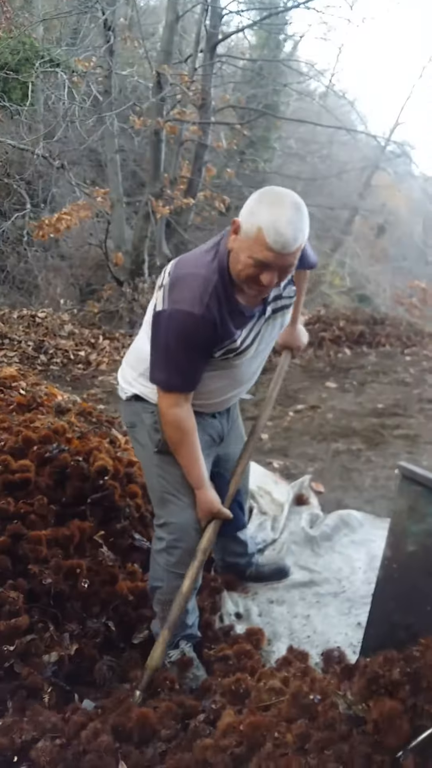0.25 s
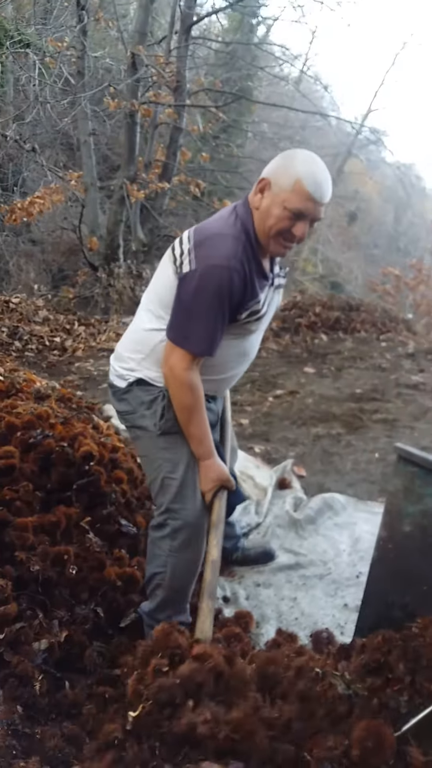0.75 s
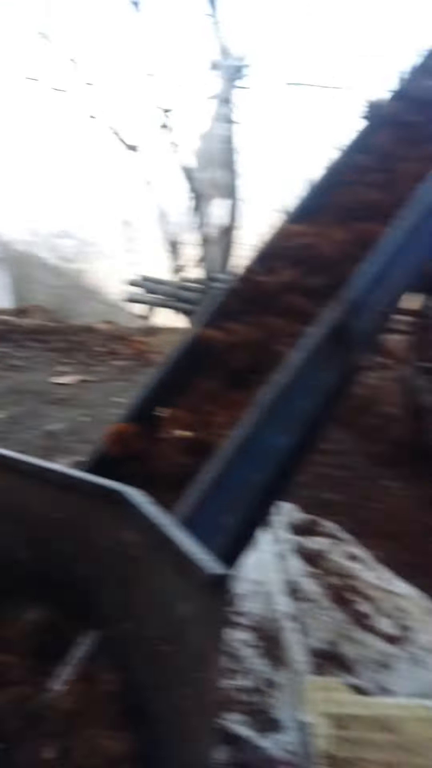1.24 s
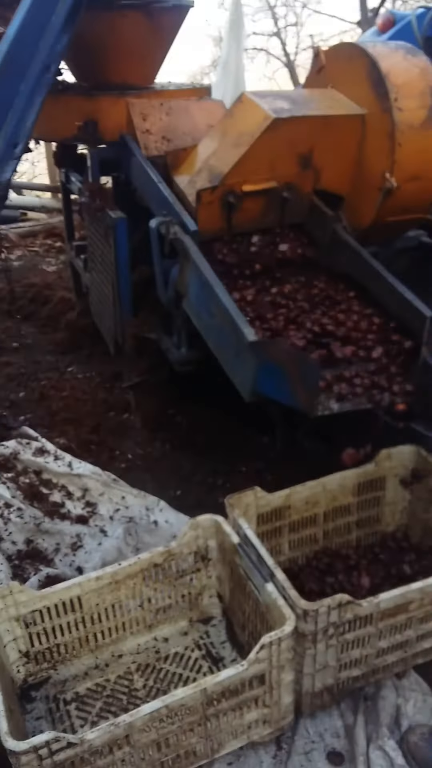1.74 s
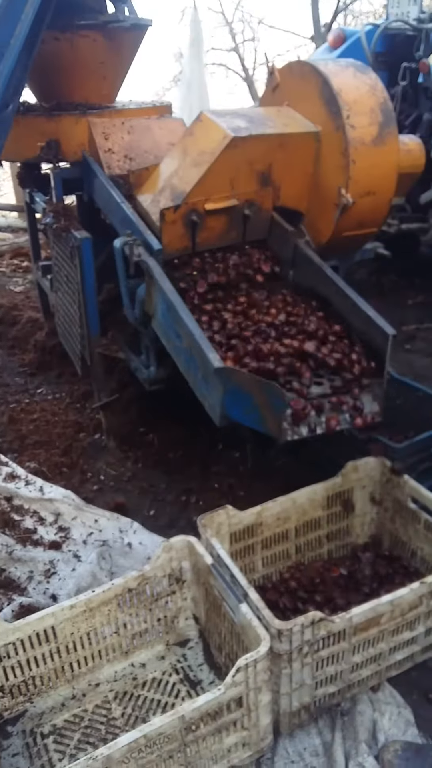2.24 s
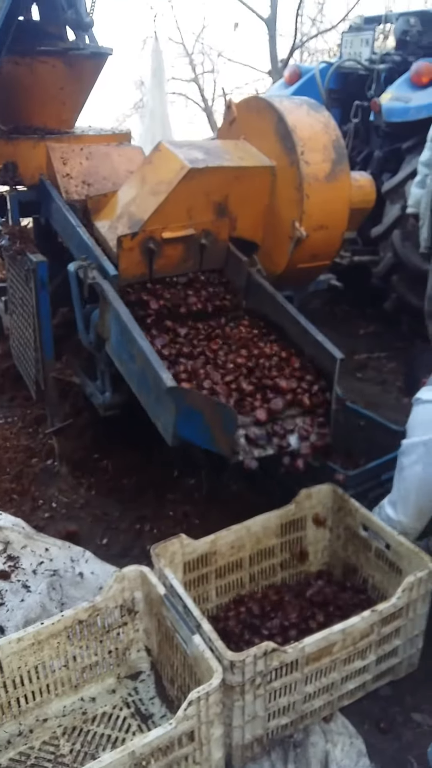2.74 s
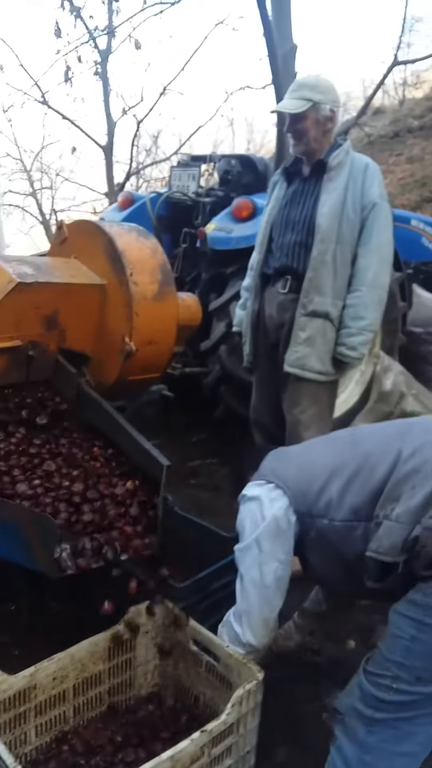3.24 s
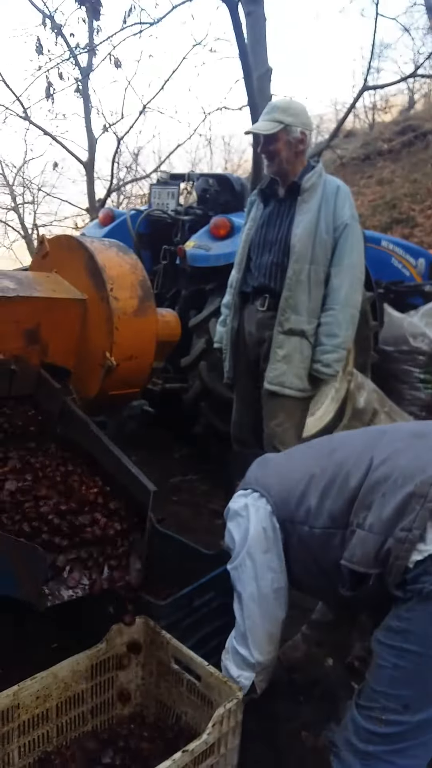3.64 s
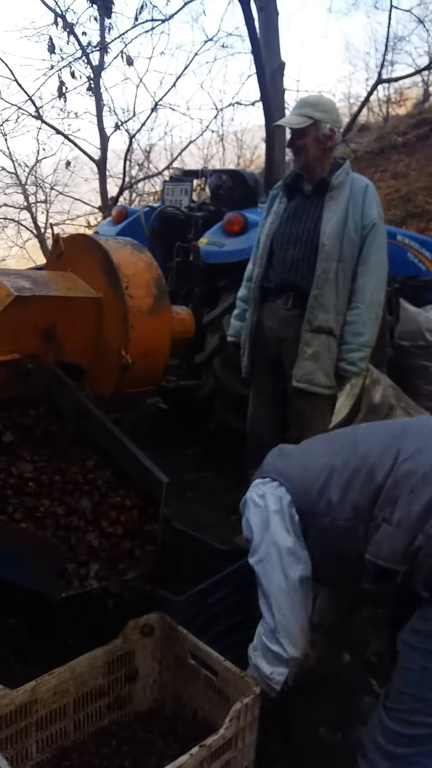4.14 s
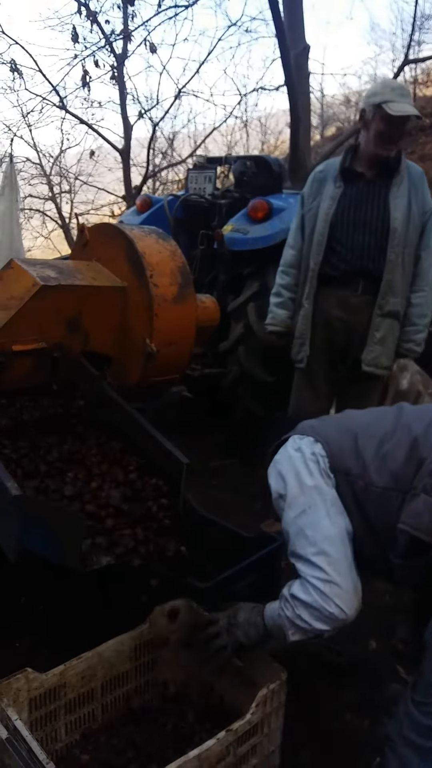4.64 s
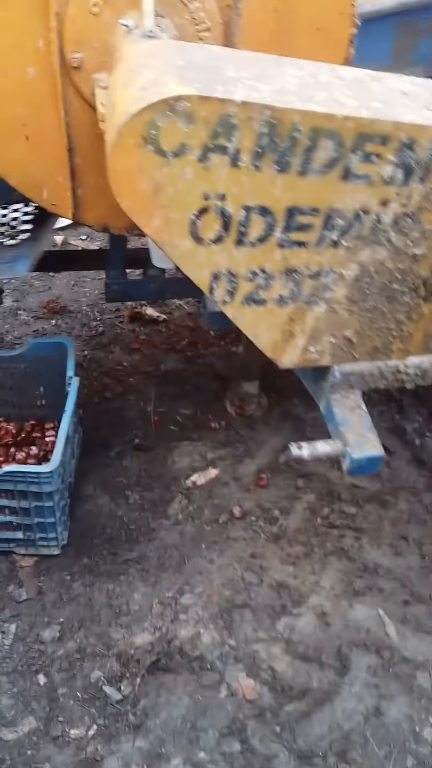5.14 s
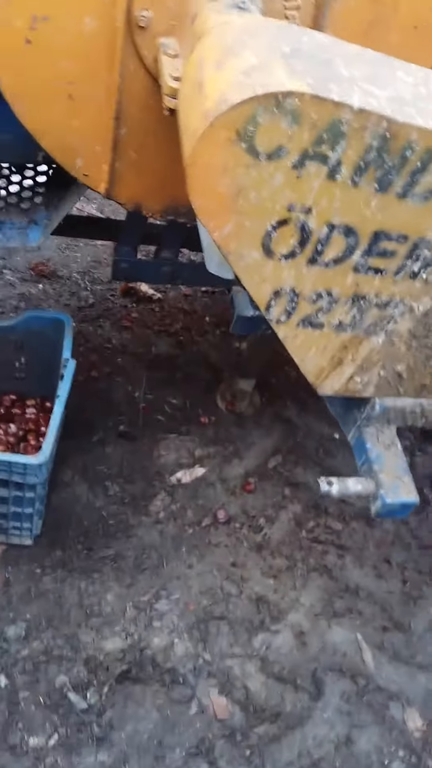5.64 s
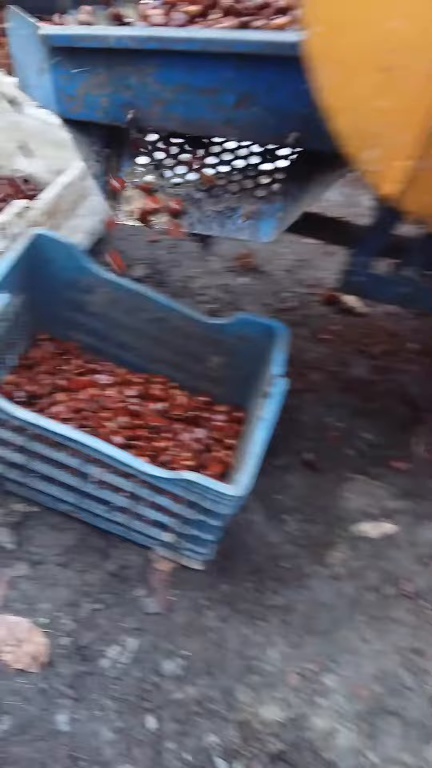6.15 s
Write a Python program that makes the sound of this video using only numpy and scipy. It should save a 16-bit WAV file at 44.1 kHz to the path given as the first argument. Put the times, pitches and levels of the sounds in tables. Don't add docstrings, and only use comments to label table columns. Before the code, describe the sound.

From 0 s a husking machine is already at full power outdoors, heard from a few metres by a hand-held phone. A low blower drone hums steadily, wavering slightly in pitch, over dense air roar and a faint low tractor rumble. Nuts rattle on sheet metal, shaken about nine times a second, and single nuts tick and knock into plastic crates. Around 0.7 to 1.2 s the rattle comes forward as the phone turns to the chute, and the drone dips briefly in pitch. Spills surge irregularly, strongly near 1.5, 2.7 and 3.7 s. At about 4.6 s it stops dead. Silence lasts until 5.0 s, then the machine fades in over a quarter second, close to the drum: fuller roar, less dominant hum, brighter metallic ringing and thin whines, rattling until 6.4 s. One side is duller throughout.

```python
import sys
import numpy as np
from scipy import signal
from scipy.io import wavfile
from scipy.ndimage import uniform_filter1d

SR = 44100
rng = np.random.default_rng(int(sys.argv[2]) if len(sys.argv) > 2 else 0)


def unload_audio(sound):
    columns = np.transpose(np.atleast_2d(sound))
    steps = np.round(np.clip(columns, -1, 1) * 32767)
    wavfile.write(sys.argv[1], SR, steps.astype(np.int16))


def voltage_ratio(level):
    return 10 ** (np.asarray(level, float) / 20)


N = 282681

STOP_S, START_S = 4.58, 5.03
HOP, FRAME = 128, 1024


def evened(x):
    return x / np.sqrt(np.mean(x ** 2) + 1e-20)


def read(points, hz):
    f, value = np.transpose(points)
    return np.interp(np.log(hz + 1), np.log(f + 1), value)


def follow(tables, t):
    s, *columns = np.transpose(tables[0] + tables[1])
    return np.array([np.interp(t, s, c) for c in columns])


def drift(low_hz, top_hz, t):
    rates_hz = np.geomspace(low_hz, top_hz, num=16)
    return evened(sum(np.sin(2 * np.pi * (f * t + rng.random())) / np.sqrt(f) for f in rates_hz))


def smooth_drift(low_hz, top_hz, t):
    slow = t[::HOP]
    return np.interp(t, slow, drift(low_hz, top_hz, slow))


def spectrogram(x):
    return signal.stft(x, SR, nperseg=FRAME, noverlap=FRAME - HOP)


def blower():
    # (start_s, blade_rate_hz, blade_tone_db, pulse_sharpness_db, duct_shadow_db)
    shaft = [
        [(0.0, 160.6, -11.5, 1, 2.5), (.4, 159.3, -11.5, -4, 0), (.6, 159.3, -11.5, -1.5, -1),
         (.98, 160.3, -12, 2.5, -2.5), (1.16, 156.5, -11.5, -9, -10), (1.3, 155.9, -9.5, -6.5, -5),
         (1.45, 159.4, -10.5, 2, 2), (2.0, 159.6, -11, 3, -0.5), (2.2, 158, -11.5, -3.5, 4.5),
         (2.45, 159.8, -11.5, 2, 0), (2.75, 158.6, -11.5, -4, 1.5), (3.3, 162.9, -10, 1, 1.5),
         (4.05, 165.1, -12, 5.5, 0), (4.58, 159.6, -11, 4, -3.5)],
        [(5.3, 165.7, -16.5, -3, 2.5), (5.55, 166.6, -15, 1.5, 1), (5.97, 165.3, -13.5, 1, -13),
         (6.3, 167.5, -12, -1, -2)],
    ]
    multiples = (1, 2, 3, 4, 4 / 5)
    # (loss_db, lag_rad)
    port_rule = [
        [(0, .3), (-3.3, .25), (-8, 1.4), (-8, .7), (0, .3)],
        [(-1.6, .47), (-8.8, 1.25), (-4, .9), (-7.6, .9), (-1.6, .4)],
    ]
    # (far_db, near_db, tone_share, sharpness_share, shadow_share)
    level_rule = [
        (0, -0.5, 0.99, 0, 0),
        (-22, -24, 0.011, 1, 0),
        (-25.5, -27.5, 0.025, .25, 0.88),
        (-34.5, -34, 0, 0, .4),
        (-29.5, -38, 0.0077, 0.52, 0.1),
    ]
    wanders = (.4, .4, .6, 1.2, 2.)
    wobbles = (.5, 1.3, .8, 1.2, 1.5)
    duct_lags = (0, 0, 2.35, -1.2, 0)
    # (centre_hz, width_hz)
    fourth = (637., 30.)
    # (centre_hz, width_hz, rms_db)
    sixth = (982., 30., -37.)
    # (ratio, rms_db)
    weak_orders = [(.6, -42), (1.4, -44), (2.2, -42.5)]

    t = np.arange(N) / SR
    near = (t > START_S).astype(int)
    hz, *controls = follow(shaft, t)
    turn = 2 * np.pi * np.cumsum(hz) / SR

    levels = []
    for (far_db, near_db, *shares), wander_db in zip(level_rule, wanders):
        base_db = np.where(near, near_db, far_db) + np.dot(shares, controls)
        levels.append(base_db + wander_db * smooth_drift(1.18, 4., t))
    fourth_hz, fourth_width_hz = fourth
    levels[3] = levels[3] - 10 * np.log10(1 + (2 * (4 * hz - fourth_hz) / fourth_width_hz) ** 2)

    out = np.zeros((2, N))
    for k, wobble_db, duct, db, far_port, near_port in zip(multiples, wobbles, duct_lags, levels, *port_rule):
        loss_db, lag = np.transpose([far_port, near_port])[:, near]
        size = np.sqrt(2) * voltage_ratio(db + wobble_db * smooth_drift(5., 22., t))
        angle = k * (turn + 0.014 * smooth_drift(1.9, 25., t)) + duct
        open_port = voltage_ratio(-loss_db / 2) * np.cos(angle)
        covered_port = voltage_ratio(loss_db / 2) * np.cos(angle - lag)
        out += size * np.array([open_port, covered_port])

    peak_hz, width_hz, peak_db = sixth
    out += np.sqrt(2) * voltage_ratio(peak_db) * np.cos(6 * turn) / (1 + (2 * (6 * hz - peak_hz) / width_hz) ** 2)
    for k, db in weak_orders:
        out += np.sqrt(2) * voltage_ratio(db) * np.cos(k * turn + smooth_drift(.5, 6., t))
    return out


def engine():
    # (pitch_hz, rms_db)
    orders = [(38, -61), (57, -42), (76, -40.5), (96, -45)]
    t = np.arange(N) / SR
    swell, bend = [smooth_drift(.5, 8.7, t) for _ in range(2)]
    out = np.zeros(N)
    for hz, db in orders:
        angle = 2 * np.pi * hz * t + hz / 57 * 0.3 * bend
        out += np.sqrt(2) * voltage_ratio(db + 1.8 * swell) * np.sin(angle)
    return out


def whines():
    # (pitch_hz, far_rms_db, near_rms_db, covered_port_loss_db)
    tones = [(1825, -56, -45, 12), (3901, -49, -42, 22), (4860, -53, -48, 22), (8090, -76, -60, 25)]
    t = np.arange(N) / SR
    out = np.zeros((2, N))
    for hz, far_db, near_db, cover_db in tones:
        bend, swell = (smooth_drift(0.62, 13.0, t) for _ in range(2))
        level_db = np.where(t < START_S, far_db, near_db) + 1.4 * swell
        tone = voltage_ratio(level_db) * np.sin(2 * np.pi * np.cumsum(hz * (1 + .002 * bend)) / SR)
        out += np.sqrt(2) * tone * voltage_ratio(np.array([[0], [-cover_db]]))
    return out


def sieve(t):
    rate_hz, peak_s = 8.85, 0.307
    return np.cos(2 * np.pi * rate_hz * (t - peak_s) + .3 * drift(0.17, 3.5, t))


def swells(t, hz, near, beat):
    # (roar_db, rumble_db, ring_db, stream_db)
    usual = [
        (.3, 0.5, -.5, -1.5),
        (.5, 2.5, -.5, -1),
    ]
    # (centre_s, swell_db, length_s, pitch_hz)
    clumps = [(0.08, 3.5, 0.022, 4200), (.2, 2, 0.6, 1000), (.31, 3.5, 0.054, 2500), (1.082, 4.5, .1, 400),
              (1.5, 2.5, 0.23, 200), (1.77, 3, 0.023, 3500), (2.0, 0, .1, 400), (2.7, 0.5, 0.23, 1000),
              (3.17, 2, 0.077, 400), (3.601, 0.5, .35, 1200), (3.96, 0.5, 0.063, 250),
              (4.38, 4, 0.078, 1000), (4.57, 5, 0.047, 1200), (5.42, 5, .12, 4000), (5.52, 1.5, .06, 500),
              (5.918, 1, .05, 1200), (6.12, 2, 0.072, 4200), (6.369, 2, .06, 600)]
    # (peak_s, swell_db)
    spills = [(.28, 9.5), (.66, 2), (1.0, 10), (1.1, 6), (1.41, 5), (1.54, 8.5), (1.78, 8.5), (2.12, 3),
              (2.2, 0), (2.48, 3), (2.67, 11.5), (2.79, 7.5), (2.85, 1.5), (3.13, 5), (3.41, 9),
              (3.69, 12.5), (3.91, -1), (4.0, 2.5), (4.27, 5), (4.18, 4), (4.35, 7), (4.42, 4), (4.57, 6),
              (5.762, 7.5), (5.856, 1), (6.028, 6), (6.178, 2), (6.282, 8.5), (6.35, 5.5), (6.41, 4.5)]
    clump_octaves, ring_beat_db = 1.5, 0.65
    rise_s, fall_s = 0.037, 0.026
    turn_s, turn_length_s, away_db = 0.72, .5, -4

    roar_db, rumble_db, ring_db, stream_db = np.transpose(usual)[:, near]
    low = read([(250, 0.72), (600, 0)], hz)[:, None]
    high = read([(2500, 0.27), (3500, 0.92)], hz)[:, None]
    air_db = low * (rumble_db + 1.2 * drift(1.5, 9., t))
    air_db = air_db + high * (ring_db + ring_beat_db * beat) + (1 - low - high) * roar_db
    for s, db, length_s, pitch_hz in clumps:
        spread = np.log2((hz + 1) / pitch_hz)[:, None] / clump_octaves
        air_db = air_db + db * np.exp(-((t - s) / length_s) ** 2 - spread ** 2)

    for s, db in spills:
        stream_db = stream_db + db * np.exp(-abs(t - s) / np.where(t < s, rise_s, fall_s))
    facing_away = np.clip(1 - (t - turn_s) / turn_length_s, 0, 1)
    return air_db, stream_db + away_db * facing_away


def nuts(per_s=2500., spread_db=3.3, ring_s=.0015):
    # (start_s, peak_db)
    knocks = [(0.1427, -42), (0.6225, -43.5), (0.644, -30), (0.9252, -34.5), (0.9642, -34), (1.2064, -36),
              (1.2391, -29), (1.3036, -32), (1.417, -33), (1.7729, -41), (1.811, -35), (1.886, -33),
              (2.5635, -34), (2.7782, -41), (2.9463, -56.5), (3.4008, -32.5), (3.6406, -34),
              (3.6613, -39.5), (3.686, -38), (3.902, -46.5), (4.1885, -37), (4.537, -35), (5.036, -45),
              (5.1404, -29.5), (5.2723, -39.5), (5.9289, -38.5), (6.2726, -32.5), (6.3527, -36.5)]
    sizes = voltage_ratio(spread_db * np.minimum(rng.exponential(1, (2, N)), 5))
    hits = sizes * (rng.random((2, N)) < per_s / SR)
    ring = np.exp(-np.arange(2000) / SR / ring_s)
    burst = evened(np.sqrt(abs(signal.oaconvolve(hits ** 2, ring[None])[:, :N])))
    for s, db in knocks:
        part = burst[:, round(s * SR):][:, :2000]
        part += voltage_ratio(db + 41.) * np.exp(-np.arange(part.shape[1]) / SR / .0025)
    return burst * rng.standard_normal((2, N))


def panels(count=110, per_s=12., spread_db=2.5, cycles=450.):
    out = np.zeros((2, N))
    pitches = np.linspace(500 ** .5, 13000 ** .5, count) ** 2 * rng.uniform(.98, 1.02, count)
    strikes = round(per_s * N / SR)
    for hz in pitches:
        hits = np.zeros(N)
        hits[rng.integers(0, N, strikes)] = voltage_ratio(spread_db * np.minimum(rng.exponential(1, strikes), 4))
        decay_s = 0.033 + cycles / (hz + 1500)
        r = np.exp(-np.log(1000) / (SR * decay_s))
        ring = signal.lfilter([1], [1, -2 * r * np.cos(2 * np.pi * hz / SR), r * r], hits)
        out += evened(ring) * hz ** .25 * rng.choice([-1, 1], (2, 1))
    return evened(out)


def place_colour(place, hz):
    # (pitch_hz, density_db)
    colour = [
        [(30, -32.5), (110, -7), (200, -4), (400, -2.5), (800, -7.5), (1700, -10.5), (2900, -16), (3900, -13.5),
         (5500, -19), (6100, -26), (8000, -35), (11500, -42), (12500, -45.5), (15000, -51.5)],
        [(30, -29), (110, -10), (200, 0), (400, -2), (800, -9), (1700, -11), (3100, -16.5), (3900, -12.5),
         (5600, -17), (6100, -24.5), (8000, -35), (11500, -37.5), (12800, -46.5), (15000, -46.5)],
    ]
    colour_db = (-19, -16.5)
    # (pitch_hz, loss_db)
    cover = [
        [(110, -1), (200, -1), (400, 1), (800, 6.5), (1100, 6.5), (1700, 10.5), (2600, 16), (3900, 23.5),
         (4500, 28), (5500, 25), (6600, 16.5), (11000, 14), (15200, 15.5)],
        [(110, 0.5), (200, 0), (400, 6.5), (800, 4), (1700, 14.5), (2300, 10.5), (3000, 16.5), (3900, 21),
         (5500, 26), (6600, 21), (11000, 16), (15200, 11)],
    ]
    # (pitch_hz, likeness_ratio)
    likeness = [
        [(25, .8), (60, 0.95), (150, 1), (380, 0.86), (800, 0.89), (1600, .5), (3000, 0.6), (9000, 0.4)],
        [(60, 1), (150, 0.51), (380, 0.37), (800, 0.34), (1600, 0.31), (3000, .3), (9000, .3)],
    ]
    # (pitch_hz, lag_rad)
    port_lag = [(60, 0.048), (260, 0.14), (520, 0.69), (1300, 1.19), (2200, 2.05)]
    # (pitch_hz, width_hz, above_roar_db)
    casing = [
        [(408, 57, -5.5), (231, 67, -1), (984, 9.8, 4), (1825, 60, 2), (3640, 280, 1), (4030, 150, 2),
         (4900, 42, -0.5), (14200, 900, 7.5)],
        [(840.2, 60, -0.5), (1820, 50, 6.5), (3670, 160, 6), (4040, 140, 6.5), (4900, 39, 10.5), (5330, 123, 5),
         (8090, 40, 12), (14000, 900, 7)],
    ]

    rings_db = sum(db / (1 + (2 * (hz - f) / width_hz) ** 2) for f, width_hz, db in casing[place])
    gain = voltage_ratio(read(colour[place], hz) + rings_db)
    gain = voltage_ratio(colour_db[place]) * evened(gain) * (hz < 15900)
    covered = voltage_ratio(-read(cover[place], hz)) * np.exp(-1j * read(port_lag, hz))
    return gain, covered, np.clip(read(likeness[place], hz), -1, 1)


def machine(patchy_db=0.73, flicker_db=0.56):
    # (pitch_hz, share_ratio)
    rattle_share = [(300, 0.026), (1200, 0.36), (3500, 0.36), (6500, 0.48), (12000, 0.54)]
    # (pitch_hz, share_ratio)
    fleck_share = [(500, .05), (1200, 0.22), (4000, 0.27), (6000, 0.35), (12000, 0.13)]

    hz, t, air = spectrogram(rng.standard_normal((2, N)))
    rattle = spectrogram(nuts())[2]
    ringing = spectrogram(panels())[2]
    fleck = np.clip(read(fleck_share, hz), 0, 1)[:, None]
    air = np.sqrt(1 - fleck) * air + np.sqrt(fleck) * ringing

    near = (t > (STOP_S + START_S) / 2).astype(int)
    beat = sieve(t)
    swell_db, stream_db = swells(t, hz, near, beat)
    top = read([(5500, 0.22), (6800, 0.85)], hz)[:, None]
    patches = rng.standard_normal(air.shape[:0:-1]).T
    patches = uniform_filter1d(patches, size=10, axis=0)
    patches = evened(uniform_filter1d(patches, size=20, axis=1))

    shake_db = flicker_db * drift(4., 13.0, t) + beat
    rattle_db = top * stream_db + (0.5 - top) * swell_db + shake_db
    share = np.clip(read(rattle_share, hz), 0, 1)[:, None]
    z = np.sqrt(1 - share) * air * voltage_ratio(swell_db) + np.sqrt(share) * rattle * voltage_ratio(rattle_db)

    places = zip(place_colour(0, hz), place_colour(1, hz))
    gain, cover, same = (np.transpose(pair)[:, near] for pair in places)
    ports = np.array([z[0], cover * (same * z[0] + np.sqrt(1 - same ** 2) * z[1])])
    coloured = ports * gain * voltage_ratio(patchy_db * patches)
    return signal.istft(coloured, SR, nperseg=FRAME, noverlap=FRAME - HOP)[1][:, :N]


def thumps():
    # (start_s, peak_db)
    landings = [(0.2927, -11), (0.7197, -16), (0.738, -12), (0.83, -14), (0.9832, -12), (1.144, -9),
                (1.1898, -22), (1.696, -20), (1.879, -14), (1.969, -12.5), (2.0744, -19), (2.2083, -20),
                (2.501, -16), (2.663, -13), (2.84, -19), (2.961, -18), (3.3997, -14.5), (3.6608, -17.5),
                (3.686, -15.5), (3.9852, -13), (4.4695, -19), (4.5375, -12), (5.0325, -38), (5.0504, -34),
                (5.0815, -31)]
    out, t = np.zeros((2, N)), np.arange(1500) / SR
    draws = rng.random((len(landings), 12))
    for (s, db), draw in zip(landings, draws):
        hz = 1000. * 6. ** draw[:6, None]
        modes = np.sin(2 * np.pi * (hz * t + draw[6:, None])) * voltage_ratio(-60 * t / .014)
        ring = modes.sum(axis=0) * np.minimum(t / .0003, 1)
        part = out[:, round(s * SR):][:, :len(t)]
        part += voltage_ratio(db - 6.0) * voltage_ratio(np.array([[0], [-22.]])) * ring[:part.shape[1]]
    return out


def scene():
    return blower() + engine() + whines() + machine() + thumps()


def emptied_bands(x):
    # (pitch_hz, share_ratio)
    holes = [
        [(2000, 0), (2600, .004), (5500, .008), (7000, .04), (9500, .12), (11800, .18), (12500, .45),
         (14000, .3), (15100, .45), (15300, .985)],
        [(3900, .02), (4300, .25), (6000, .3), (9000, .4), (15100, .45), (15300, .985)],
    ]
    overlap = FRAME - 2 * HOP
    hz, t, z = signal.stft(x, SR, nperseg=FRAME, noverlap=overlap)
    draw = rng.random((2, len(hz) // 4 + 1, len(t) // 5 + 1))
    draw = draw.repeat(4, axis=1).repeat(5, axis=2)
    empty = draw[:, :len(hz), :len(t)] < np.array([read(port, hz) for port in holes])[:, :, None]
    return signal.istft(z * np.where(empty, .03, 1), SR, nperseg=FRAME, noverlap=overlap)[1][:, :N]


def low_pass(x):
    return signal.sosfilt(signal.butter(12, 15762, fs=SR, output="sos"), x)


def record(dry):
    t = np.arange(N) / SR
    limited = dry / (1 + abs(dry) ** 8) ** (1 / 8)
    stop = np.clip((STOP_S - t) / 0.00082, 0, 1)
    since = t - START_S
    fade = np.clip(since / 0.0031, 0, 1) * np.clip(0.024 + since / 0.24, 0, 1)
    return low_pass(emptied_bands(limited) * (stop + fade))


dry = scene()
out = record(dry)
unload_audio(out)
```